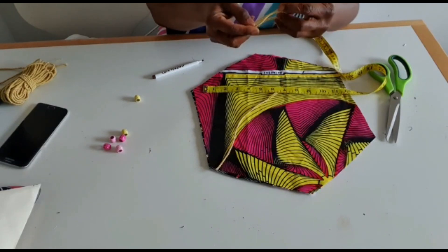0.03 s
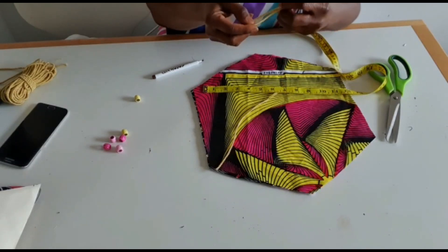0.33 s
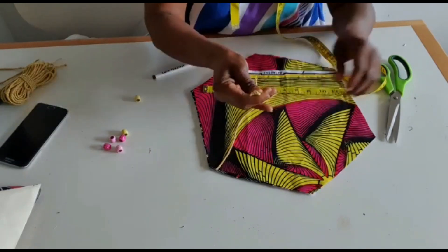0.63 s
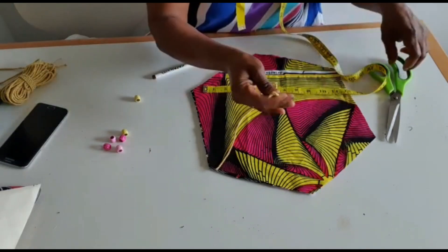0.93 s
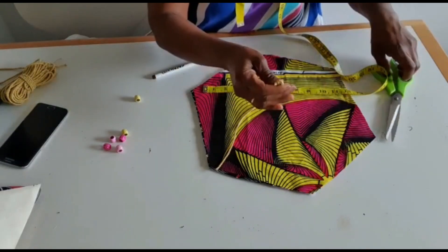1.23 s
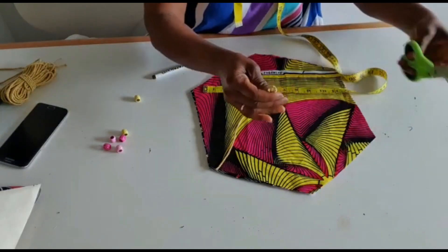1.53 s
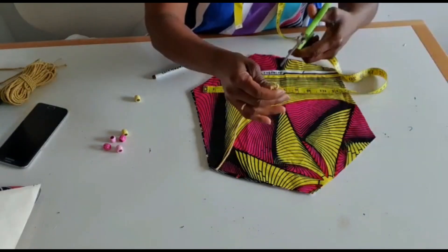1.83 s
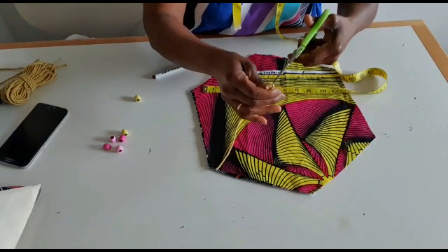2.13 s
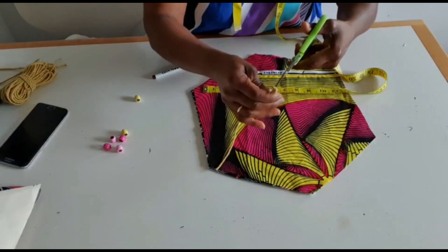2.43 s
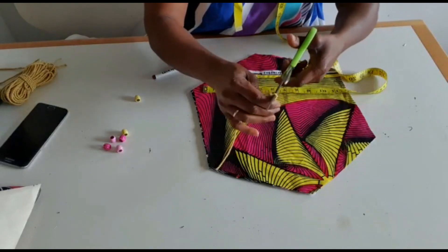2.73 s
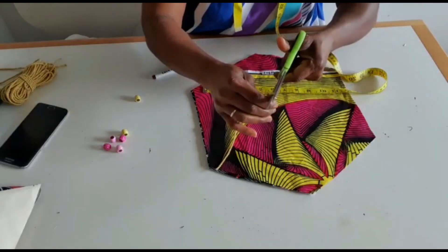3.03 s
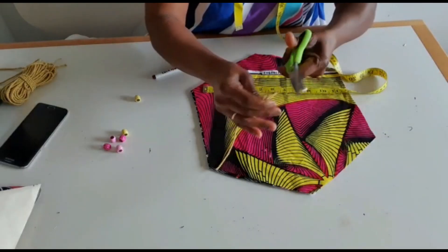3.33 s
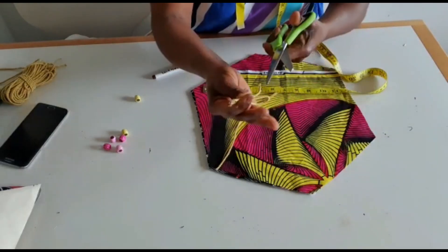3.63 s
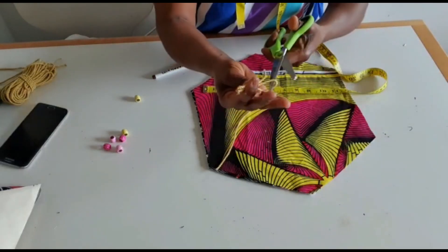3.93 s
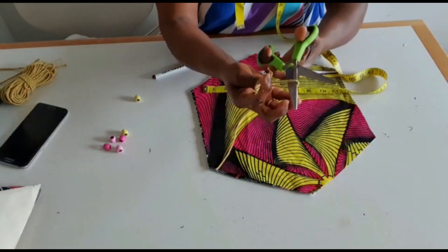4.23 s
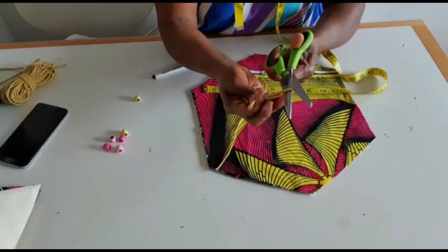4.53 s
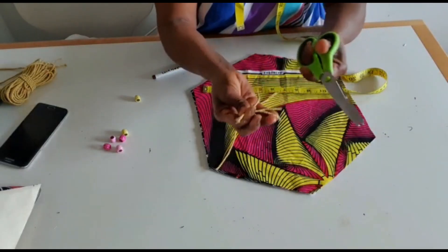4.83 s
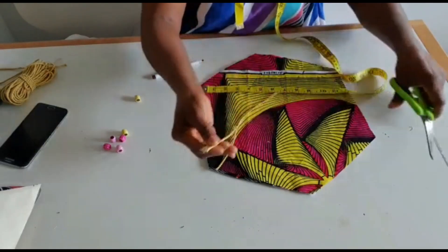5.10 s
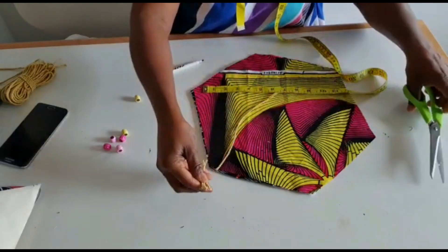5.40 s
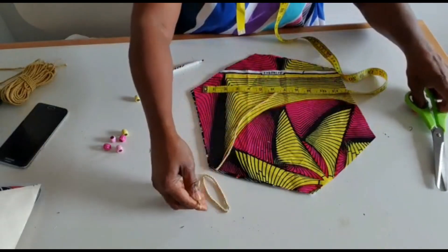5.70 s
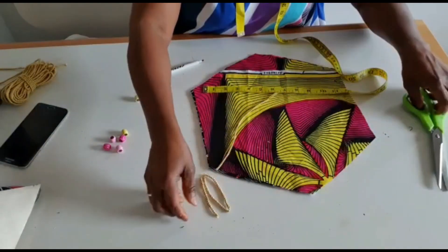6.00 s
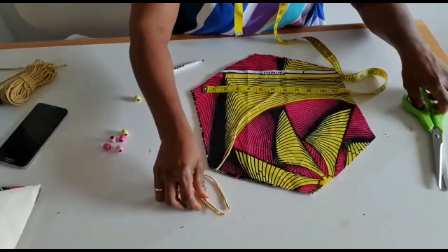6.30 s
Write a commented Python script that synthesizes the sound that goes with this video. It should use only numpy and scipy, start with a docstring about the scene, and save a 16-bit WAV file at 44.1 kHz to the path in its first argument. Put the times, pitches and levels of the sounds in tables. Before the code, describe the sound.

A low, steady motor hum and faint hiss fill a small bare room throughout. After a barely audible rustle of cord, scissors scuff and knock on a tabletop from about 1 second, ending in a bright clatter of steel blades and plastic handles as they are lifted at 1.5 seconds. The blades open with a short rasp and click near 1.8 seconds. A quiet stretch follows, with only tiny blade and cord sounds. At 3.3 seconds comes a crisp snip through the cord, then a lighter snip and slide around 3.5 seconds. The blades snap shut near 4.9 seconds, followed by faint scraping. At 5.7 seconds the scissors are laid on the table with a sharp metallic clack and brief rattle. Another knock comes at 6.1 seconds, then a few soft bumps. The handling sounds nearby, each knock ringing briefly in the room.

```python
"""Dressmaking scissors snip a cord

The scissors are picked up from a table, opened, snip a cord, are closed and laid down again.
Each knock sounds the table board, the plastic handles and the steel blades; the blades rasp as they
slide and snap as they meet. A small bare room rings after it all, over a distant motor and faint hiss."""
import sys
import numpy as np
from scipy import signal
from scipy.fft import rfft, irfft
from scipy.io import wavfile

SR = 44100
rng = np.random.default_rng(int(sys.argv[2]) if len(sys.argv) > 2 else 0)


def transcribe(signal):
    """Save signal, clipped to [-1, 1], as a 16-bit WAV file at the path in sys.argv[1]."""
    frames = np.atleast_2d(signal).T
    limited = np.clip(frames, -1, 1)
    pcm = np.round(limited * 32767).astype(np.int16)
    wavfile.write(sys.argv[1], SR, pcm)


N = 280343
TIME = np.arange(N) / SR

# Blades snapping or clacking together: start_s, steel_db, tick_db, thud_db, tone_hz, tone_db
SNIP_CUES = [(1.791, -59, -58, -83.5, 1920, -73), (1.830, -57, -57.5, -86.5, 1780, -63.5),
             (2.584, -84.5, -88, -86, 2300, -88.5), (3.3244, -49, -42, -50.5, 1945, -59.5),
             (3.3281, -47.5, -57, -53, 2100, -57), (3.481, -58.5, -63.5, -62.5, 2290, -60),
             (3.536, -65, -72, -96, 3530, -64), (4.8938, -57, -46.5, -59.5, 2320, -54.5),
             (5.112, -73, -75, -85.5, 2344, -89), (5.528, -73, -89, -82, 1634, -69.5),
             (5.7174, -37.5, -41, -69, 1750, -52), (5.725, -62, -55.5, -71.5, 4250, -41)]
# Knocks on the table: the grip, a clatter on lifting, the set-down, then soft bumps.
# The spot struck favours one board pitch; a harder blow has a higher top.
# start_s, board_db, handles_db, blades_db, tick_db, spot_hz, top_hz
KNOCK_CUES = [ (1.072, -42.5, -59, -55, -70, 293, 5700), (1.086, -40, -66, -54.5, -66.5, 215, 3870),
              (1.125, -46.5, -78, -69, -79, 200, 3000), (1.167, -42.5, -70, -62, -87, 415, 2300),
              (1.2090, -36.5, -40.5, -49, -74, 433, 2830), (1.217, -32.5, -49.5, -55, -77, 460, 2570),
              (1.246, -37.5, -49, -66, -72.5, 320, 2302), (1.471, -43.5, -54.5, -68, -74, 328, 2403),
              (1.484, -62, -64, -69, -60.5, 348, 4970), (1.5027, -46, -52.5, -50, -46, 360.4, 8000),
              (1.5141, -38, -42, -29.5, -41, 364.6, 12000), (1.518, -38, -38, -37.5, -65, 364, 6200),
              (1.551, -37.5, -37, -41.5, -63, 369.2, 3980), (5.525, -61, -75, -66.5, -77.5, 302, 5340),
              (5.7167, -47.5, -47.5, -44.5, -48, 68, 9100), (5.724, -47.5, -49, -53, -68.5, 146, 8000),
              (5.738, -44, -47.5, -42.5, -53, 196, 5100), (5.760, -51.5, -50.5, -42, -56, 150, 5000),
              (5.874, -57, -60, -57, -83, 156, 4200), (6.0878, -43, -40.5, -44, -64.5, 410, 4370),
              (6.105, -45.5, -42.5, -54, -85, 424, 3460), (6.277, -60.5, -76, -81.5, -84, 287, 2000),
              (6.313, -58, -85, -81.5, -100, 280, 1500), (6.340, -57.5, -90, -86, -94, 298, 1500)]
# Rubbing strokes: start_s, length_s, level_db
SHEAR_STROKES = [(1.783, 0.039, -51.5), (2.70, .13, -81.5), (2.96, 0.053, -81), (3.300, .022, -56),
                 (3.485, 0.09, -62), (4.884, 0.015, -49.5), (5.112, 0.041, -71), (5.160, 0.021, -65),
                 (5.32, 0.13, -87)]  # edge sliding along edge
DRAG_STROKES = [(1.04, 0.065, -62.5), (1.16, 0.052, -52.5), (1.32, 0.1, -65), (1.395, 0.063, -58),
                (5.61, 0.14, -70.5), (6.02, 0.077, -69.5)]  # handles pulled over the table
CORD_STROKES = [(.62, 0.82, -80.5), (2.59, 0.063, -85), (2.98, 0.066, -78), (4.03, 0.052, -80),
                (4.21, 0.045, -94), (5.31, 0.058, -74.5)]  # fingers working the cord

# Tone colour of each layer: frequency_hz, gain_db
SNIP_STEEL_EQ = [(200, -50), (1000, -6.5), (1500, -8.5), (1900, 2), (2300, 1.5), (2900, -2.5), (3800, 1),
                 (5000, -5.5), (8000, -7), (15000, -23)]  # bright body of the snap
SNIP_TICK_EQ = [(500, -32), (3000, -4), (5000, 2.5), (7500, -1.5), (9000, 0), (10500, 1), (12000, 2),
                (14500, -3)]  # its sharp edge
SNIP_THUD_EQ = [(50, -8), (150, -4), (400, -1), (650, -8.5), (1200, -26), (5000, -32)]  # its weight in the handles
BOARD_EQ = [(25, -31), (60, -9.5), (110, -15.5), (160, -10), (250, -12), (330, -4), (520, -9.5),
            (750, -16.5), (1500, -29), (5000, -60), (14000, -84.5)]  # table thud
HANDLE_EQ = [(100, -29.5), (400, -10), (520, -6.5), (660, -9.5), (770, -2), (890, 0), (1080, 0),
             (1280, -8.5), (1750, -4), (2200, -9), (3200, -23), (8000, -52.5), (14000, -83)]  # plastic clack
BLADE_EQ = [(200, -31), (1000, -20), (1380, -10), (1780, 4.5), (2050, -4.5), (2380, -10), (2720, -1),
            (3100, -3), (3500, -2), (3850, -6), (4300, -8), (4850, -9), (5450, -6), (8000, -20.5),
            (14000, -40)]  # steel clash
KNOCK_TICK_EQ = [(300, -25), (2000, -10), (4000, 0.5), (6000, 5), (8000, 2), (10000, -1), (11500, -13.5),
                 (15000, -19.5)]  # bright tip of a knock
RASP_EQ = [(200, -23), (900, -13), (1400, -9.5), (1850, -3.5), (2300, -4), (2800, -11), (3600, 0),
           (4300, -6), (5500, -6), (10000, -2), (15000, -11)]  # sliding blades
SCUFF_EQ = [(60, -10), (300, 1.5), (600, -2.5), (1200, -4.5), (1900, -1), (2800, -18.5), (5000, -18),
            (14000, -41)]  # dragged handles
FIBRE_EQ = [(100, -8), (300, -3.5), (550, 2.5), (1200, -8.5), (2400, -6.5), (4000, -11.5), (14000, -19)]  # rustling cord
HISS_EQ = [(100, -4.5), (180, -6.5), (320, -3), (480, -6.5), (1000, -8), (1500, -11), (2400, -10),
           (4000, -13), (8000, -17.5), (14500, -18.5)]  # room air
RUMBLE_EQ = [(15, -20.5), (30, -13), (48, 1), (70, -4), (110, -4), (150, -17), (250, -26.5), (600, -57.5)]  # low room rumble

# Ringing modes of each part: pitch_hz, level_db, t60_s
SNIP_RING = [(2230, -4.5, 0.69), (3660, -18, 0.23), (3980, -4, 0.11), (4390, -3, 0.37), (7400, 0, .25),
             (10500, -13, 0.22)]  # blades struck against each other
BOARD_RING = [(66.4, -4, 0.98), (147, -4, 0.65), (178.7, -1, 0.4), (205, -6.5, .2), (285, -3, 0.41),
              (312.5, 3.5, 0.25), (361.8, 2, .3), (432.5, -2, .2), (532, -0.5, 0.17)]  # table board
HANDLE_RING = [(658.4, -12, 0.13), (791, -8, .35), (883, 0.5, 0.16), (947, -8.5, .28), (1073, 2.5, 0.39),
               (1111, -4.5, 0.23), (1560, -7.5, .3), (1740, -2, 0.25), (1774, -7, 0.19)]  # plastic handles
BLADE_RING = [(1520, -8.5, 0.33), (1677, -1.5, 0.38), (1775, -5, 0.44), (1800, 1, 0.18), (2230, -9.5, .35),
              (2820, -4.5, .25), (2850, -6.5, 0.11), (3105, -2, 0.33), (3420, -3, .28), (3530, -2.5, 0.094),
              (4107, -5.5, 0.22), (4580, -11, 0.18), (5060, -15, .4), (5830, -14, 0.31)]  # blades knocked on the table

# Decay of the small bare room: band_hz, t60_s
ROOM_DECAY = [(60, 0.86), (150, 0.38), (350, 0.27), (1000, 0.34), (2000, 0.37), (4000, 0.35), (8000, 0.34),
              (15000, 0.32)]
# A distant motor turning just under mains speed: pitch_hz, level_db
MOTOR_PARTIALS = [(49.3, -64.5), (98.7, -71.5), (148, -91), (286, -96.5), (344.5, -97), (1087, -99)]


def snips(chatter_s=0.0043, ring_db=-8, tone_width_hz=90):
    """The cord gives way or the blades meet their stop: a bright snap, a small thud in the handles."""
    out = np.zeros((2, N))
    for start_s, steel_db, tick_db, thud_db, tone_hz, tone_db in SNIP_CUES:
        layers = zip((steel_db, tick_db, thud_db), (SNIP_STEEL_EQ, SNIP_TICK_EQ, SNIP_THUD_EQ))
        snap = sum(undb(db) * colour(contact(chatter_s), eq) for db, eq in layers)
        # the blades' main tone changes with the opening; the hand damps it and the room carries it on
        resonance = signal.iirpeak(tone_hz, tone_hz / tone_width_hz, fs=SR)
        tone = signal.lfilter(*resonance, contact(chatter_s))
        tone *= np.sqrt(SR / (np.pi * tone_width_hz))  # make-up gain for the narrow band
        add(out, start_s, in_room(snap + undb(tone_db) * tone))
        add(out, start_s, undb(steel_db + ring_db) * ring(SNIP_RING, rise_s=0.0012))
    return out


def knocks(thud_db=-4, board_ring_db=-1, handle_ring_db=-3, blade_ring_db=-5.5):
    """Scissors meet the table: one blow is shared between board, handles, blades and a bright tick."""
    out = np.zeros((2, N))
    for start_s, board_db, handles_db, blades_db, tick_db, spot_hz, top_hz in KNOCK_CUES:
        chatter_s = 0.0068 * (4170 / top_hz) ** 0.55  # a softer contact chatters for longer
        layers = zip((board_db + thud_db, handles_db, blades_db, tick_db),
                     (BOARD_EQ, HANDLE_EQ, BLADE_EQ, KNOCK_TICK_EQ))
        thud, clack, clash, tick = (undb(db) * colour(contact(chatter_s), eq) for db, eq in layers)
        add(out, start_s, in_room(thud + clack + soften(clash, top_hz) + tick))
        add(out, start_s, crack(tick_db, top_hz))
        board = undb(board_db + board_ring_db) * ring(board_modes(spot_hz), rise_s=0.0035)
        handles = undb(handles_db + handle_ring_db) * ring(HANDLE_RING, rise_s=0.011)
        blades = undb(blades_db + blade_ring_db) * soften(ring(BLADE_RING, rise_s=0.0036), top_hz)
        add(out, start_s, board + handles + blades)
    return out


def crack(tick_db, top_hz, trim_db=-6, chatter_s=0.00089, full_hz=9500):
    """The first touch of steel: a dry, bright click, strong only when the contact is hard."""
    eq = [(500, -27.5), (2500, -7.5), (6000, 1), (12000, -1.5), (15000, -6.5)]
    hardness = min(top_hz / full_hz, 1)
    click = np.array([colour(contact(chatter_s), eq) for _ in range(2)])
    return undb(tick_db + trim_db) * hardness * click


def board_modes(spot_hz, off_spot_db=7, spot_octaves=0.27, db_per_octave=2.5):
    """The place of the blow decides which board modes swing most: those near spot_hz."""
    octaves_away = abs(np.log2(np.transpose(BOARD_RING)[0] / spot_hz))
    loss_db = off_spot_db * np.tanh(octaves_away / spot_octaves) + db_per_octave * octaves_away
    return [(hz, db - loss, t60) for (hz, db, t60), loss in zip(BOARD_RING, loss_db)]


def contact(chatter_s, size=8192):
    """One blow: a first touch and a fading chatter of tiny rebounds, even in spectrum."""
    fade = np.exp(-np.arange(size) / SR / chatter_s)
    force = rng.standard_normal(size) * fade
    for _ in range(5):
        whitened = irfft(np.exp(1j * np.angle(rfft(force))))
        force = whitened * np.minimum(20 * fade, 1)
    return force * np.sqrt(SR * 0.04) / np.linalg.norm(force)


def ring(modes, rise_s, wide_hz=900):
    """Decaying modes, a little different at every blow; high ones reach left and right out of step."""
    t, out = np.arange(SR // 2) / SR, 0
    for (hz, db, t60), (vary_db, phase, lag) in zip(modes, rng.standard_normal((len(modes), 3))):
        phases = np.pi * phase + lag * min(hz / wide_hz, 1) * np.array([[1], [-1]])
        decay = np.exp(-np.log(1000) * t / t60)
        out = out + undb(db + vary_db) * np.sin(2 * np.pi * hz * t + phases) * decay
    return out * (1 - np.exp(-t / rise_s))


def soften(sound, top_hz):
    """A contact of finite length excites little above top_hz."""
    return signal.sosfilt(signal.butter(5, min(top_hz, 0.45 * SR), fs=SR, output="sos"), sound)


def friction(pressure, eq, slips_per_s, spread_db):
    """Dense stick-slip clicks of uneven size, following the pressure of the stroke."""
    slips = (rng.random(N) < slips_per_s / SR) * rng.standard_normal(N)
    slips *= undb(spread_db * rng.standard_normal(N))
    return colour(unit(slips) * pressure, eq)


def hand_pressure(strokes, attack_share, release_s):
    """Pressure builds over the first part of each stroke, holds, and dies away after it."""
    pressure = np.zeros(N)
    for start_s, length_s, db in strokes:
        attack = np.sin(np.pi / 2 * np.clip((TIME - start_s) / (attack_share * length_s), 0, 1)) ** 2
        release = np.exp(-np.maximum(TIME - start_s - length_s, 0) / release_s)
        pressure += undb(db) * attack * release
    return pressure


def in_room(sound, direct_db=-8.5, build_s=0.00037, build_cycles=6, size=24000):
    """The direct path, then dense wall echoes, new for every spot; the bass blooms late and lingers."""
    t, hz = np.arange(size) / SR, np.fft.rfftfreq(size, 1 / SR)
    echoes, response = rfft(diffuse(size)), 0
    centres = np.transpose(ROOM_DECAY)[0]
    for share, (band_hz, t60) in zip(np.eye(len(centres)), ROOM_DECAY):
        band = irfft(echoes * at_hz(np.c_[centres, share], hz))
        build = 1 - np.exp(-t / (build_s + build_cycles / band_hz))
        response = response + band * build * np.exp(-np.log(1000) * t / t60)
    response /= np.sqrt(np.sum(response ** 2) / 2)
    # the direct sound reaches the right side two samples sooner
    response[0, 2] += undb(direct_db)
    response[1, 0] += undb(direct_db)
    return signal.fftconvolve(sound[None], response, axes=1)


def motor_hum(waver_db=2.33, waver_rad=0.072):
    """A distant motor: its partials drift in phase together and waver in level one by one."""
    drift_s = waver_rad * wander(rate_hz=2) / (2 * np.pi * MOTOR_PARTIALS[0][0])
    hum = np.zeros(N)
    for hz, db in MOTOR_PARTIALS:
        amplitude = np.sqrt(2) * undb(db + waver_db * wander(rate_hz=4.1))
        hum += amplitude * np.sin(2 * np.pi * (hz * (TIME + drift_s) + rng.random()))
    return hum


def room_tone(eq, level_db):
    """A steady bed of coloured noise from all around."""
    return undb(level_db) * unit(np.array([colour(channel, eq) for channel in diffuse(N)]))


def diffuse(size, alike_hz=650):
    """Stereo noise from all directions: nearly mono in the bass, wide in the treble."""
    likeness = 0.96 / (1 + (np.fft.rfftfreq(size, 1 / SR) / alike_hz) ** 2)
    mid, side = rfft(rng.standard_normal((2, size)))
    mid, side = mid * np.sqrt((1 + likeness) / 2), side * np.sqrt((1 - likeness) / 2)
    return irfft(np.array([mid + side, mid - side]), size)


def colour(sound, eq, size=4096):
    """Shape a sound with a unit-energy EQ curve."""
    cepstrum = irfft(np.log(undb(at_hz(eq, np.fft.rfftfreq(size, 1 / SR)))))
    # fold to minimum phase, so nothing rings ahead of an attack
    cepstrum[1:size // 2] *= 2
    cepstrum[size // 2 + 1:] = 0
    response = irfft(np.exp(rfft(cepstrum)))
    return signal.fftconvolve(sound, response / np.linalg.norm(response))[:len(sound)]


def at_hz(curve, hz):
    """Read a curve of (frequency_hz, value) points on a log-frequency axis."""
    curve_hz, values = np.transpose(curve)
    return np.interp(np.log(hz + 1), np.log(curve_hz), values)


def wander(rate_hz):
    """Slow random modulation, spread near 1."""
    knots = rng.standard_normal(int(N / SR * rate_hz) + 2)
    return np.interp(TIME * rate_hz, np.arange(len(knots)), knots)


def undb(db):
    """Decibels to gain."""
    return 10 ** (np.asarray(db) / 20)


def unit(sound):
    """Scale to rms 1."""
    return sound / np.sqrt(np.mean(sound ** 2))


def pan(sound, right_db):
    """Tilt the balance so the right side leads by right_db."""
    return sound * undb(np.array([[-right_db], [right_db]]) / 2)


def add(track, start_s, sound):
    """Mix a stereo sound in at its cue."""
    start = int(start_s * SR)
    track[:, start:start + sound.shape[1]] += sound[:, :N - start]


def scene():
    """Knocks, snips and rubbing sit a little to the right, over hum, hiss and rumble."""
    shear = hand_pressure(SHEAR_STROKES, attack_share=0.32, release_s=0.0056)
    drag = hand_pressure(DRAG_STROKES, attack_share=0.45, release_s=0.018)
    fingers = hand_pressure(CORD_STROKES, attack_share=0.21, release_s=0.025)
    rasp = friction(shear, RASP_EQ, slips_per_s=5700, spread_db=4.5)
    scuff = friction(drag, SCUFF_EQ, slips_per_s=1500, spread_db=4)
    rustle = friction(fingers, FIBRE_EQ, slips_per_s=400, spread_db=2)
    handling = knocks() + snips() + in_room(rasp + scuff + rustle)[:, :N]
    hum = pan(motor_hum(), right_db=2.3)
    hiss = room_tone(HISS_EQ, level_db=-79.5)
    rumble = room_tone(RUMBLE_EQ, level_db=-72.5)
    return pan(handling, right_db=0.88) + hum + hiss + rumble


def record(dry, cutoff_hz=14750):
    """A steep low-pass takes off the very top."""
    return signal.sosfilt(signal.ellip(8, 0.2, 70, cutoff_hz, fs=SR, output="sos"), dry)


dry = scene()
out = record(dry)
transcribe(out)
```